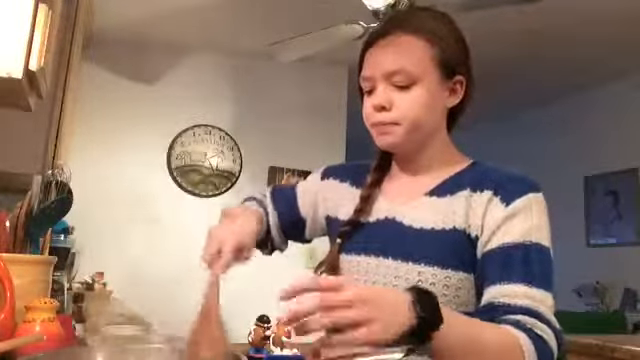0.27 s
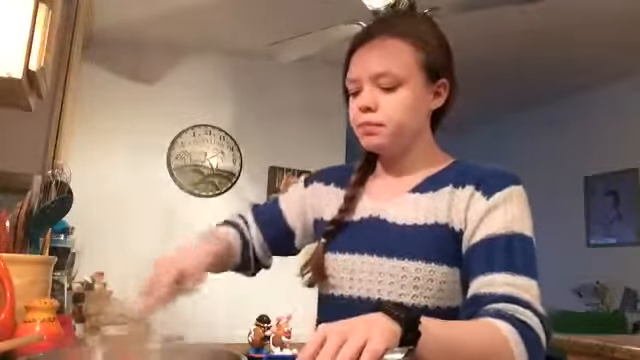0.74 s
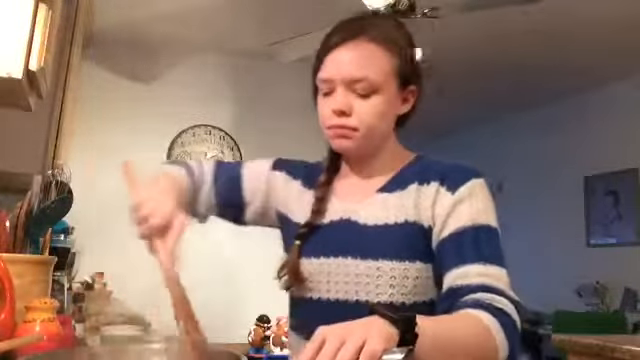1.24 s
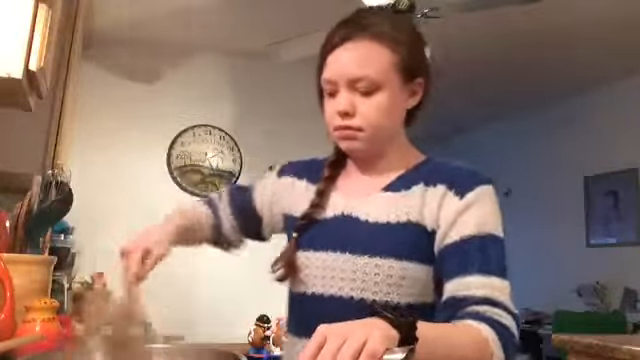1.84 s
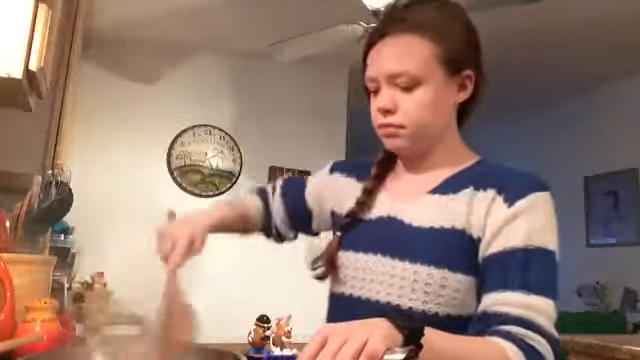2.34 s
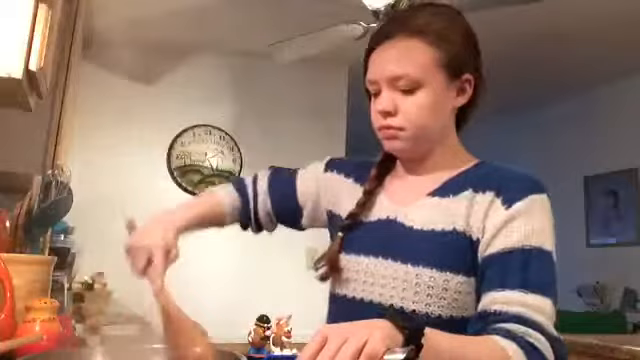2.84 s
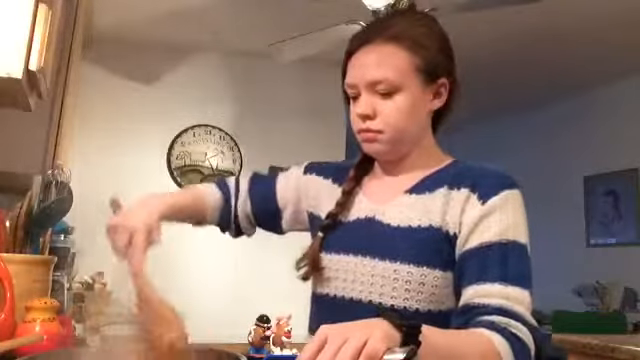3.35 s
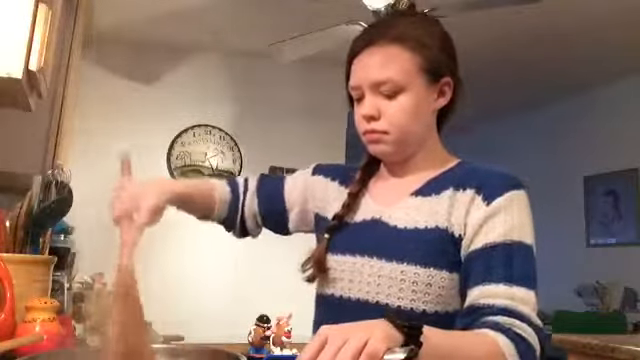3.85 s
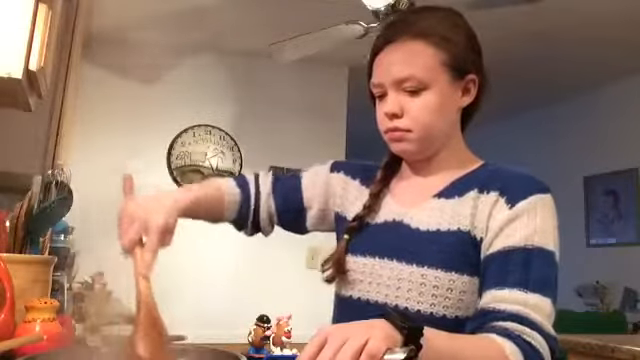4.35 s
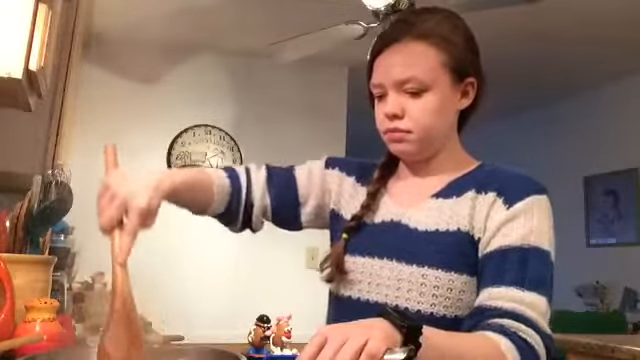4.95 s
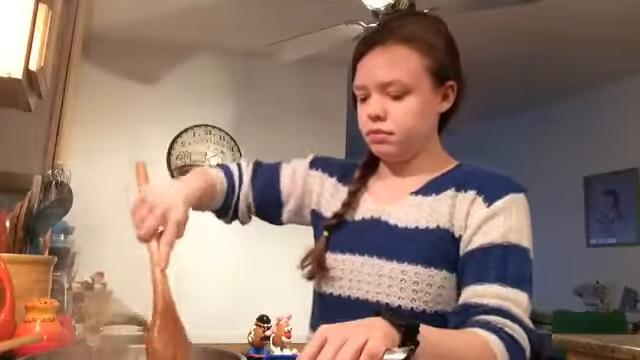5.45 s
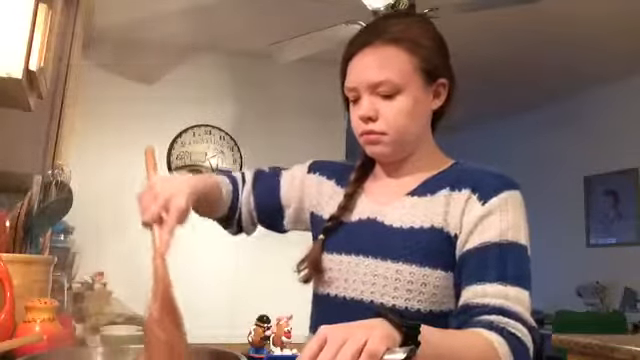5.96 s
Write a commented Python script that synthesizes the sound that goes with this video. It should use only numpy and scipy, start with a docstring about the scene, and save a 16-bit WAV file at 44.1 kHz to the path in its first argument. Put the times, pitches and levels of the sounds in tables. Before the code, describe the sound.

Wood taps on a frying pan at uneven intervals, each a short damped clack with a little metallic clatter. Early blows are muffled by meat; later ones are brighter and harder. Between them the spoon rubs and skids with brief squeaks, while trapped steam spits and squeals midway. The quiet sizzle grows a little in the second half. Close phone pickup, lightly reverberant kitchen, steady airy noise and faint mains hum.

```python
"""A short rub of the spoon with a faint hiss of steam over a low sizzle is heard first; then wooden clacks.
Each blow on the metal frying pan is a damped pulse that spreads into a clatter and excites the pan's modes.
Pushes rub in tiny slips and raise hiss from the fat; brief squeaks are stick-slip tones.
Steam under the pressed meat escapes as hissing bands of noise and as a pulsed squeal.
Sizzle made of tiny clicks, coloured kitchen noise and a mains hum go on underneath."""
import sys
import numpy as np
from scipy import signal
from scipy.fft import rfft, irfft, next_fast_len
from scipy.io import wavfile
from scipy.ndimage import uniform_filter1d

SR = 44100
rng = np.random.default_rng(int(sys.argv[2]) if len(sys.argv) > 2 else 0)


def inscribe(sig):
    """Save sig as 16-bit PCM at rate SR to the path in sys.argv[1].

    A 1-D sig is mono; a 2-D sig holds one channel per row.
    Samples are clipped to [-1, 1] before scaling.
    """
    pcm = np.round(np.clip(np.atleast_2d(sig).T, -1, 1) * 32767)
    wavfile.write(sys.argv[1], SR, pcm.astype(np.int16))


N = 274169
TIME = np.arange(N) / SR

# spectrum of the kitchen air: [f/Hz, relative level/dB]
AIR_COLOUR = [(30, -8), (90, 10), (120, -30), (150, -2), (250, -4), (450, -4), (530, -7.5), (800, -1),
              (1450, -3.5), (2000, -10.5), (3000, -12.5), (8500, -18), (15500, -30)]
# reflections from nearby hard faces, worktop and wall: [delay t/s, gain]
REFLECTIONS = [(.0029, 0.17), (0.0225, 0.16)]
# course of the sizzle: [t/s, level/dB]
SIZZLE_LEVELS = [(0, -73.5), (1.1, -73.5), (2.5, -74), (3.3, -70.5), (4.7, -69.5), (5.3, -69), (6.2, -71.5)]
# spectrum of water bursting in fat: [f/Hz, relative level/dB]
FAT_SPECTRUM = [(500, -5.5), (2500, 1.5), (4500, -1.5), (9000, -3.5), (12000, -13), (15500, -35)]
# puffs of trapped steam: [peak t/s, decay to 1/e t/s, centre f/Hz, level/dB]
STEAM_PUFFS = [(0.035, 0.061, 4660, -64.5), (3.166, .07, 4470, -64.5), (3.543, 0.14, 2680, -55.5),
               (3.974, 0.24, 4100, -63), (4.157, 0.055, 4460, -57.5), (4.282, 0.033, 4550, -54),
               (4.557, 0.038, 3700, -56), (4.955, 0.032, 7700, -66)]
# two steam vents under pressed meat, each a track: [t/s, pitch f/Hz, level/dB before SQUEAL_DB]
VENT_TRACKS = [
    [(3.44, 860, -68), (3.55, 872, -60), (3.63, 925, -61), (3.71, 1008, -57), (3.76, 1025, -54.5),
     (3.83, 1008, -56), (3.90, 995, -68)],
    [(3.77, 1075, -70), (3.82, 1090, -55), (3.86, 1085, -54.5), (3.91, 1010, -59), (3.96, 935, -63),
     (4.08, 900, -74)],
]
# spectrum of the vents: [f/Hz, relative level/dB]
VENT_SPECTRUM = [(900, -22), (2000, -9.5), (3100, -9.5), (4200, 0), (5200, -7), (7000, -11.5), (9300, -18),
                 (14000, -49)]
# wood slipping on metal: [start t/s, length t/s, start f/Hz, end f/Hz, tone level/dB]
STICK_SLIPS = [(0.759, 0.061, 630, 553, -47.5), (0.781, 0.024, 2530, 2450, -47.5),
               (2.027, 0.015, 3270, 3300, -55.5), (3.963, 0.025, 1283, 1480, -48.5),
               (4.004, 0.041, 1140, 2000, -50.5), (4.252, 0.033, 1250, 1220, -44.5),
               (4.307, 0.05, 969, 1380, -48)]
# spectrum of wood rubbing on metal: [f/Hz, relative level/dB]
RUB_SPECTRUM = [(100, 11), (200, -9), (380, 0), (520, -1), (750, -1.5), (1020, -3), (1500, 1), (2000, -8),
                (2500, -9), (3500, -15.5), (8000, -44)]
# pushes through the meat: [peak t/s, decay to 1/e t/s, rubbing level/dB, hiss level/dB]
SPOON_PUSHES = [(0.01, 0.04, -50, -70.5), (0.255, 0.011, -48, -61), (0.356, 0.051, -53.5, -71.5),
                (0.788, 0.051, -59, -66.5), (1.67, 0.066, -59.5, -75), (2.09, 0.062, -61, -72),
                (3.104, 0.089, -54.5, -71), (3.434, 0.019, -61, -57), (3.49, 0.063, -47.5, -62.5),
                (3.974, 0.11, -77, -66), (4.536, 0.021, -50.5, -62.5), (4.803, 0.021, -47.5, -53.5),
                (5.096, 0.013, -52, -68), (5.21, 0.12, -61, -72.5), (5.507, 0.0072, -52, -70),
                (5.654, 0.083, -54, -69.5), (6.048, 0.024, -53, -66)]
# modes of the pan on its hob: [f/Hz, relative level/dB, fall by 60 dB t/s]
PAN_MODES = [(122, -37, 0.21), (193.3, -2.5, 0.077), (250, -2, 0.062), (284.7, 3, 0.037),
             (364.3, -13.5, 0.16), (416.3, -3.5, 0.072), (564, -15, 0.25), (610, -15.5, 0.056),
             (725.2, -7, 0.14), (769, -6.5, 0.036), (884, -8, 0.052), (1181, -2, 0.038), (1275, -16, 0.055),
             (1457, -7, 0.05), (1586, -7.5, 0.067), (1745, -17.5, 0.11), (2030, -27, 0.086),
             (2384, -12, 0.071), (2745, -7.5, 0.077)]
# spoon blows: [t/s, clack level/dB, clack f/Hz, ring level/dB, f/Hz favoured by the place struck]
# the clack is low where meat cushions the blow; the favoured pitch is high near the rim
SPOON_BLOWS = [(0.2695, -31.5, 614, -37.5, 420), (0.6633, -38, 190, -31, 200), (1.28, -54, 400, -44.5, 200),
               (1.3062, -44.5, 590, -38, 427), (1.9619, -38.5, 500, -36, 307), (2.4131, -28, 820, -35, 426),
               (2.806, -34.5, 493, -32.5, 200), (3.103, -22.5, 1090, -23, 473),
               (3.5660, -22, 1080, -34, 1370), (3.9478, -38.5, 1040, -41, 1250),
               (4.531, -41.5, 416, -39, 216), (4.817, -12, 1040, -28, 820), (5.373, -32, 890, -37.5, 1220),
               (5.588, -33.5, 930, -39.5, 193), (5.8150, -14.5, 1370, -28.5, 1540)]

AIR_DB, AIR_SWAY_DB = -62.5, 0.7
HUM_DB, HUM_HZ = -70.5, 120
SIZZLE_SWAY_DB = 0.3
PUFF_WIDTH = 1.213  # ratio of band edge to centre
RISE_SHARE, RISE_STEEPNESS = 0.83, 2.7  # rise time over decay time, and exponent of the rise
SQUEAL_DB = -1.1  # gain of both vents together
SKID_RUB_DB = -8.5  # rubbing relative to a squeak's tone
# hiss of a push: centre, ratio of band edge to centre, spatter relative to the hiss
HISS_HZ, HISS_WIDTH, SPATTER_DB = 3890, 1.48, 4.5
USUAL_DB = -32  # clack of a usual blow, the reference for force
# shove after a blow: decay to 1/e, levels for a usual blow, dB gained per dB of force
SHOVE_S, SHOVE_RUB_DB, SHOVE_HISS_DB, SHOVE_GROWTH = 0.055, -55.5, -72, 0.54
# ring cut-off over clack pitch for a usual blow, and its growth with force
CONTACT_RATIO, CONTACT_OCTAVES_PER_DB = 1.06, 0.05
# lift of the favoured modes for a usual blow; the lift itself grows by 0.25 dB of gain per dB of force
LIFT_DB, LIFT_GROWTH = 4.5, 0.25
# treble limit of a bare clack at BARE_HZ; it follows a power of the clack pitch
WOOD_TOP_HZ, WOOD_TOP_POWER, BARE_HZ = 2630, 0.49, 1000
TOP_HZ = 15750  # upper limit of the phone


def undb(db):
    """Amplitude gain is ten to the power of decibels over twenty."""
    return 10 ** (np.asarray(db) / 20)


def unit(x):
    """Division by the root mean square gives a signal of rms 1."""
    return x / np.sqrt(np.mean(x ** 2))


def colour(x, points):
    """Spectral shaping: levels interpolated over log frequency weight the spectrum; rms 1."""
    hz, db = np.transpose(points)
    size = next_fast_len(len(x) + 4096)
    bins = np.maximum(np.fft.rfftfreq(size, 1 / SR), 1)
    gain = undb(np.interp(np.log(bins), np.log(hz), db))
    return unit(irfft(rfft(x, size) * gain, size)[:len(x)])


def butter(x, hz, kind, order=2):
    """Causal Butterworth filtering: a maximally flat low-, high- or band-pass."""
    edges = np.minimum(hz, SR / 2 - 1000)
    return signal.sosfilt(signal.butter(order, edges, kind, fs=SR, output="sos"), x)


def walk(rate):
    """Random modulation: averaging held random steps gives smooth motion of spread 1."""
    hold = int(SR / rate)
    steps = np.repeat(rng.standard_normal(N // hold + 1), hold)
    return unit(uniform_filter1d(steps, hold))[:N]


def grains(rate, spread_db):
    """Shot noise: tiny clicks of uneven size at random moments, rate per second; rms 1."""
    struck = rng.random(N) < rate / SR
    sizes = rng.standard_normal(N) * undb(spread_db * rng.standard_normal(N))
    return unit(struck * sizes)


def add(out, s, x):
    """Superposition: mix x into out from time s."""
    i = int(s * SR)
    out[i:i + len(x)] += x[:max(N - i, 0)]


def background():
    """Steady broadband noise of the kitchen air is joined by an appliance's sinusoidal mains hum."""
    air = colour(rng.standard_normal(N), AIR_COLOUR) * undb(AIR_DB + AIR_SWAY_DB * walk(7.2))
    return air + undb(HUM_DB) * np.sin(2 * np.pi * HUM_HZ * TIME)


def kitchen(x, wet_db=-6, t60=0.36, bass_db=-1):
    """Room response: direct sound, discrete early reflections, then an exponential diffuse tail."""
    t = np.arange(SR * 3 // 4) / SR
    spectrum = [(150, bass_db), (600, -2.9), (1600, -4.3), (4000, 2.0), (12000, 1.55)]
    tail = colour(rng.standard_normal(len(t)), spectrum)
    tail *= undb(-60 * t / t60) * (1 - np.exp(-t / 0.007))
    response = undb(wet_db) * tail / np.linalg.norm(tail)
    response[0] += 1
    for delay, gain in REFLECTIONS:
        response[int(delay * SR)] += gain
    return signal.fftconvolve(x, response)[:N]


def frying():
    """Many random bursts of water in fat merge into a sizzle, which is louder from about 3.3 s."""
    level_db = np.interp(TIME, *np.transpose(SIZZLE_LEVELS)) + SIZZLE_SWAY_DB * walk(7.1)
    return colour(grains(rate=2500, spread_db=0.5), FAT_SPECTRUM) * undb(level_db)


def swell(s, length):
    """Pressure builds quickly, levels off towards its peak at s, then decays exponentially."""
    gap = np.abs(TIME - s) / length
    return np.exp(-np.where(TIME < s, (gap / RISE_SHARE) ** RISE_STEEPNESS, gap))


def steam(hz, width):
    """Band-limited shot noise: dense tiny bursts hiss around one centre frequency."""
    return unit(butter(grains(rate=9000, spread_db=3), [hz / width, hz * width], "band"))


def puffs():
    """Pressure release: steam trapped under pressed meat escapes in a narrow band of hiss."""
    out = np.zeros(N)
    for s, length, hz, db in STEAM_PUFFS:
        out += undb(db) * swell(s, length) * steam(hz, PUFF_WIDTH)
    return out


def squeal(jitter=0.014, flutter_db=3.0, dull_hz=2900, full_db=-53.5):
    """Pulsed outflow: steam flutters out in rough harmonic pulses, richer in overtones when louder."""
    out = np.zeros(N)
    for vent in VENT_TRACKS:
        s, hz, db = np.transpose(vent)
        pitch = np.interp(TIME, s, hz) * (1 + jitter * walk(700))
        phase = 2 * np.pi * np.cumsum(pitch) / SR
        pulses = colour(sum(np.cos(k * phase) for k in range(1, 13)), VENT_SPECTRUM)
        dull = unit(butter(pulses, dull_hz, "low", order=6))
        level_db = np.interp(TIME, s, db, left=-200, right=-200)
        bright = np.minimum(undb(level_db - full_db), 1)
        out += (bright * pulses + (1 - bright) * dull) * undb(level_db + flutter_db * walk(90))
    return undb(SQUEAL_DB) * out


def rubbing():
    """Friction noise: tiny uneven slips of wood on metal, with a wandering level."""
    return colour(grains(rate=3000, spread_db=2), RUB_SPECTRUM) * undb(2 * walk(60))


def squeaks(overtone_db=-23):
    """Stick-slip: the skidding blade gives brief gliding tones with a second harmonic and rubbing."""
    out, wobble = np.zeros(N), 0.028 * walk(700)
    rub = undb(SKID_RUB_DB) * rubbing()
    for s, length, start_hz, end_hz, db in STICK_SLIPS:
        i, n = int(s * SR), int(length * SR)
        hz = np.linspace(start_hz, end_hz, n) * (1 + wobble[i:i + n])
        phase = 2 * np.pi * np.cumsum(hz) / SR
        tone = np.sin(phase) + undb(overtone_db) * np.sin(2 * phase)
        add(out, s, undb(db) * np.hanning(n) * (tone + rub[i:i + n]))
    return out


def pushes():
    """Friction and boiling: the blade rubs in tiny slips as wet meat on hot metal hisses and spatters."""
    rub = rubbing()
    spatter = colour(grains(rate=7000, spread_db=-1), FAT_SPECTRUM)
    hiss = steam(HISS_HZ, HISS_WIDTH) + undb(SPATTER_DB) * spatter
    out = np.zeros(N)
    for s, length, rub_db, hiss_db in SPOON_PUSHES:
        out += swell(s, length) * (undb(rub_db) * rub + undb(hiss_db) * hiss)
    # every blow also shoves the meat a little, the more the harder it lands
    shove = np.zeros(N)
    decay = np.exp(-TIME[:SR] / SHOVE_S)
    for s, clack_db, *_ in SPOON_BLOWS:
        add(shove, s, undb(SHOVE_GROWTH * (clack_db - USUAL_DB)) * decay)
    out += shove * (undb(SHOVE_RUB_DB) * rub + undb(SHOVE_HISS_DB) * hiss)
    return butter(out, 12000, "low")


def blows(clack_cycles=0.34, place_db=1.53, clatter=1.47, clatter_t60=0.0077,
          clatter_build_s=0.0023, place_octaves=0.32):
    """Impact excitation: a short clack, a clatter of dense modes, then the pan's main modes."""
    out, t = np.zeros(N), np.arange(SR // 2) / SR
    hz, db, t60 = np.transpose(PAN_MODES)[:, :, None]
    modes = undb(db - 60 * t / t60) * np.sin(2 * np.pi * hz * t)
    signs = (-1) ** np.arange(len(PAN_MODES))  # neighbouring modes swing in opposite senses
    for s, clack_db, clack_hz, ring_db, place_hz in SPOON_BLOWS:
        force_db = clack_db - USUAL_DB
        age = t * clack_hz / clack_cycles  # 1 at the envelope's peak
        envelope = age ** 2 * np.exp(2 * (1 - age))
        clack = undb(clack_db) * envelope * np.sin(2 * np.pi * clack_hz * t)

        dense = rng.standard_normal(len(t)) * undb(-60 * t / clatter_t60)
        dense *= 1 - np.exp(-t / clatter_build_s)
        dense = signal.fftconvolve(clack, dense / np.linalg.norm(dense))[:len(t)]

        # the place struck favours nearby modes, more so under a harder blow
        lift_db = LIFT_DB * undb(LIFT_GROWTH * force_db)
        distance = np.log2(hz[:, 0] / place_hz) / place_octaves
        place = lift_db * np.exp(-distance ** 2) + place_db * rng.standard_normal(len(PAN_MODES))
        ring = (signs * undb(ring_db + place)) @ modes

        # a soft contact reaches only the low modes
        contact_hz = CONTACT_RATIO * clack_hz * 2 ** (CONTACT_OCTAVES_PER_DB * force_db)
        blow = clack + clatter * dense + butter(ring, contact_hz, "low")
        # wet wood is too soft to excite the treble
        wood_hz = WOOD_TOP_HZ * (clack_hz / BARE_HZ) ** WOOD_TOP_POWER
        add(out, s, butter(blow, wood_hz, "low", order=5))
    return out


def scene():
    """Superposition: all sounds at the pan pass through the room and join the background."""
    pan = frying() + puffs() + squeal() + squeaks() + pushes() + blows()
    return (kitchen(pan) + background())[None]


def record(dry, low_cut_hz=122, rumble_db=-31, rumble_hz=200):
    """Band limiting: the phone takes out nearly all the deep bass and cuts the top steeply."""
    thin = butter(dry, low_cut_hz, "high", order=10)
    thin = thin + undb(rumble_db) * butter(dry, rumble_hz, "low", order=1)  # a trace of bass remains
    return signal.sosfilt(signal.ellip(10, 0.2, 70, TOP_HZ, fs=SR, output="sos"), thin)


dry = scene()
out = record(dry)
inscribe(out)
```